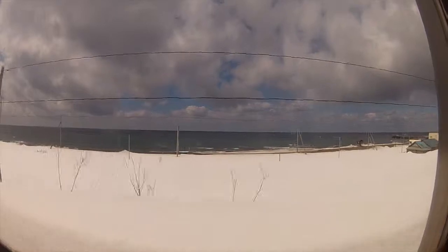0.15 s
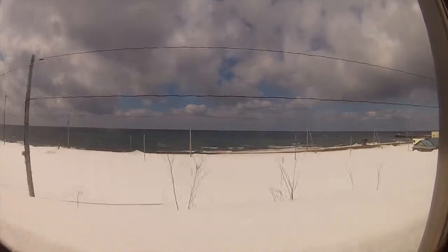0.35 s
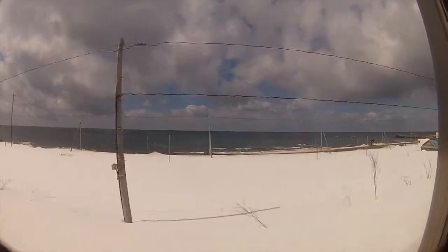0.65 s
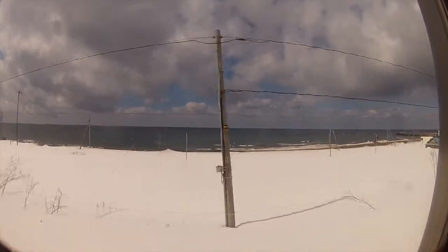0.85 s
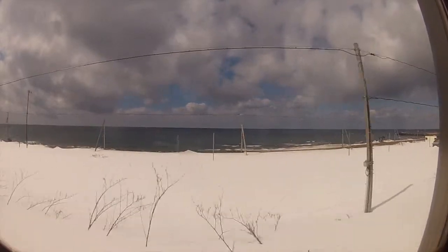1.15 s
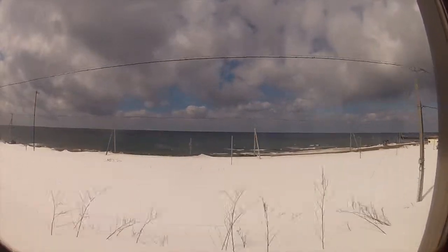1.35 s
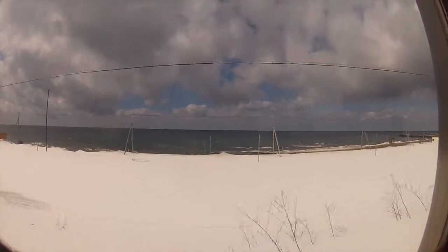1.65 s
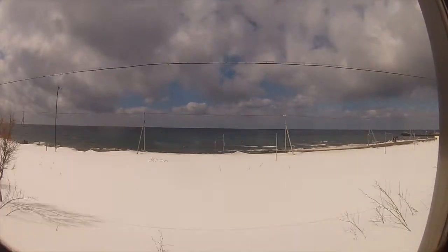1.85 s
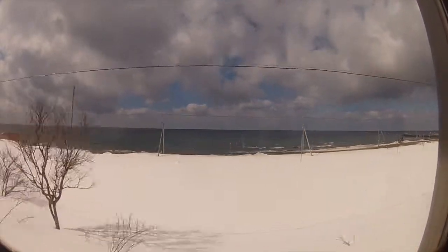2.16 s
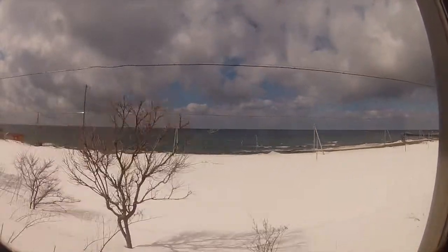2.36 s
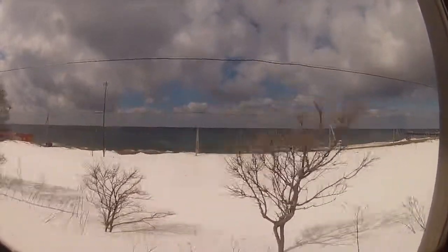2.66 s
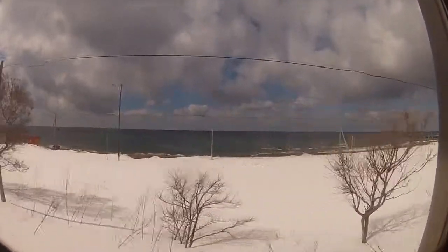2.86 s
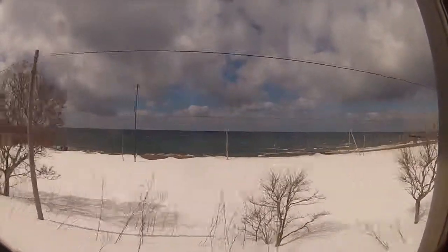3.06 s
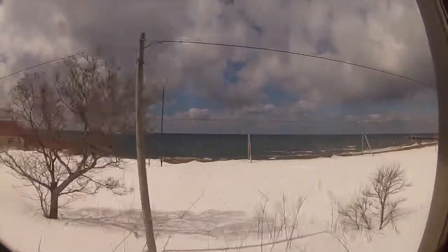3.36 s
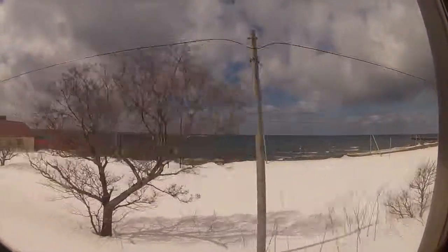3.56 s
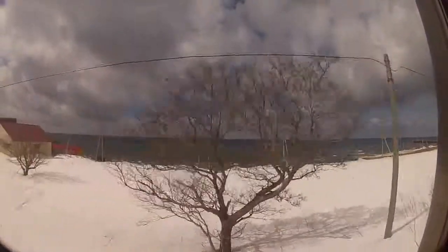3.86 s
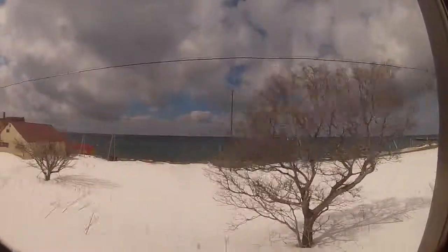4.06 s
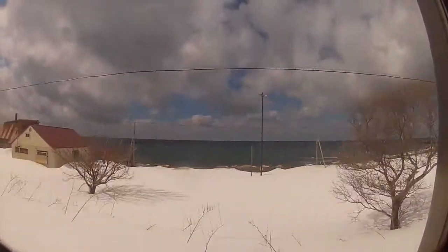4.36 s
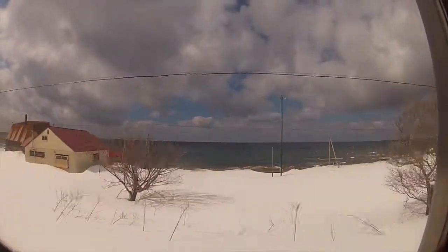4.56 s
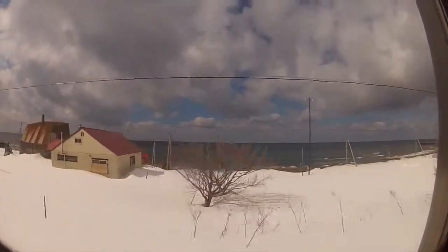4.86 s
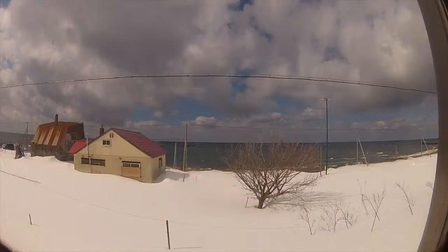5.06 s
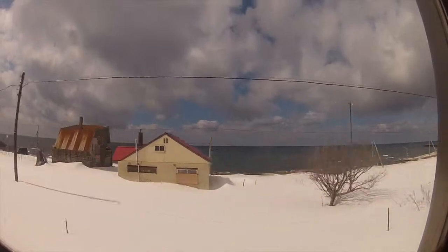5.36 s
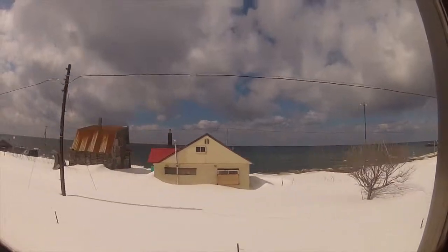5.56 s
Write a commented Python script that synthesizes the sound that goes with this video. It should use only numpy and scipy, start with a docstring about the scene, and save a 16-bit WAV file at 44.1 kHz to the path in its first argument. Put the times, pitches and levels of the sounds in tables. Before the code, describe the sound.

Heard inside a diesel railcar at speed: deep floor rumble and muffled wheel roar run throughout. The engine is faint at first, then surges before two seconds, eases, and pulls again with a rougher throb towards the end. Bogies knock dully in pairs over rail joints about every 1.1 seconds. Window fittings tick and chatter in bursts as the body shakes. A single close microphone in the cabin, slightly lo-fi.

```python
"""A diesel engine, heard inside a railcar at speed, picks up and pulls with an uneven throb: a sum of
cycle orders, plus noise puffs that boom in the cabin. Wheel noise rumbles and roars beneath.
Bogies knock over a joint once every rail length. The body shakes in spells: window fittings tick and
chatter, loose metal clinks, trim squeaks once and air hisses along the body.
Slow sample-and-hold mirrors the sound as a thin fizz around 12 kHz."""
import sys
import numpy as np
from scipy import signal
from scipy.fft import rfft, irfft, next_fast_len
from scipy.io import wavfile

SR = 44100
rng = np.random.default_rng(int(sys.argv[2]) if len(sys.argv) > 2 else 0)


def to_wav(sig):
    """Store sig (one row per channel, or 1-D mono) as 16-bit WAV at the path in sys.argv[1].

    Samples outside -1..1 are clipped; the rate is SR.
    """
    pcm = np.clip(np.atleast_2d(sig), -1, 1) * 32767
    pcm = np.round(pcm).astype(np.int16)
    wavfile.write(sys.argv[1], SR, pcm.T)  # frames by channels


N = 251811
T = np.arange(N) / SR


def gain_of(db):
    """Decibels to an amplitude factor."""
    return 10 ** (np.asarray(db) / 20)


def evened(x):
    """Scales to rms 1."""
    return x / np.sqrt(np.mean(x ** 2) + 1e-20)


def curve(rows):
    """Joins (time_s, value) rows by straight lines in time."""
    time_s, value = np.transpose(rows)
    return np.interp(T, time_s, value)


def coloured(x, spectrum):
    """Filters x with a minimum-phase, hence causal, response of the given spectrum."""
    freq_hz, db = np.transpose(spectrum)
    bin_hz = abs(np.fft.fftfreq(4096, 1 / SR))
    log_gain = np.log(gain_of(np.interp(np.log(bin_hz + 1), np.log(freq_hz), db)))
    response = np.fft.ifft(np.exp(np.conj(signal.hilbert(log_gain)))).real
    return signal.oaconvolve(x, response[:len(bin_hz) // 2])[:len(x)]


def noise(spectrum):
    """Gaussian noise of rms 1, shaped in frequency, silent above the last row."""
    freq_hz, db = np.transpose(spectrum)
    size = next_fast_len(N, True)
    bin_hz = np.fft.rfftfreq(size, 1 / SR)
    shape = gain_of(np.interp(np.log(bin_hz + 1), np.log(freq_hz), db, right=-np.inf))
    return evened(irfft(rfft(rng.standard_normal(size)) * shape, size)[:N])


def wander(max_hz):
    """Smooth random drift of rms 1: 24 sines of random phase over a decade up to max_hz."""
    t = T[::128]
    hz = np.geomspace(max_hz / 10, max_hz, 24)[:, None]
    phase_cycles = rng.random(hz.shape)
    drift = np.sin(2 * np.pi * (hz * t + phase_cycles)).sum(0)
    return np.interp(T, t, evened(drift))


def add(mix, start_s, sound):
    """Mixes a sound in place, cut at the end of the mix."""
    part = mix[round(start_s * SR):][:len(sound)]
    part += sound[:len(part)]


# four-stroke cycle rate: time_s, rate_hz
SPEED = [(0, 12.14), (1.0, 11.75), (1.4, 12.24), (1.65, 12.35), (1.9, 13.39), (2.1, 13.98), (2.4, 14.04),
         (2.7, 13.73), (3.8, 13.7), (5.71, 13.873)]
# drone level as the engine pulls: time_s, pull_db
PULL = [(0, -42), (1.47, -34), (1.72, -13.5), (1.95, -13), (2.1, -22.5), (3.3, -21), (3.78, -17),
        (4.45, -18.5), (4.65, -15), (5.71, -14.5)]
# cycle harmonics: order (multiple of cycle rate), full_pull_rel_db, follows (dB per dB of pull)
ORDERS = [(5, -43.5, .8), (6, -11, 0.37), (7, -19.5, 0.88), (8, -17, 1.2), (9, -12.5, 1), (10, -9.5, 1.07),
          (11, -1.5, 0.84), (12, 1, 1.05), (13, -24.5, 0.52), (14, -5, 0.43), (15, -19, 0.71),
          (16, -26.5, .7), (18, -25, 0.63), (20, -23, 0.45), (24, -27, 0.75)]
# cylinders that beat hardest: place_cycles (0-1), strength (factor)
BEATS = [(0, 1), (.35, .55)]
# crank-turn unevenness: time_s, lope (factor; 0 = even, sign = turn of the hardest beat)
LOPE = [(0, 0.056), (2.4, -0.68), (2.7, 0.35), (4.45, 0.61), (4.65, 0.79), (5.71, 1.14)]
# rough exhaust noise: time_s, level_db
ROAR = [(0, -33.5), (1.0, -26), (2.35, -18.5), (3.05, -30.5), (4.15, -21.5), (4.8, -29.5), (5.71, -24.5)]
# cabin boom spectrum: freq_hz, rel_db (per Hz)
BOOM = [(70, -25), (105, -14.5), (130, -5.5), (160, -6), (195, -10.5), (230, -15), (330, -31.5)]


def engine(waver=0.12, gating=0.16, full_pull_db=-15, hard_beat_s=5.0978):
    """Engine orders sum to two hard beats a cycle; each beat also puffs noise into the cabin's boom."""
    cycles = np.cumsum(curve(SPEED)) / SR
    cycles -= np.interp(hard_beat_s, T, cycles)  # the hardest cylinder fires at whole cycles
    pull_db, lope = curve(PULL), curve(LOPE)

    drone = np.zeros(N)
    for order, rel_db, follows in ORDERS:
        k = round(order)
        beat_sum = sum(strength * np.exp(-2j * np.pi * k * place) for place, strength in BEATS)
        phase_rad = np.angle(beat_sum)
        unlike_turns = lope if k % 2 else 1  # odd orders sound only when the two crank turns differ
        swell = gain_of(rel_db + full_pull_db + follows * (pull_db - full_pull_db))
        unsteady = 1 + waver * wander(7.6)
        drone += swell * unlike_turns * unsteady * np.cos(2 * np.pi * k * cycles + phase_rad)
    drone /= np.sqrt(sum(gain_of(row[1]) ** 2 for row in ORDERS) / 2)

    puffs = sum(strength * np.exp(4 * (np.cos(2 * np.pi * (cycles - place)) - 1))
                for place, strength in BEATS)
    roar = noise(BOOM) * evened(1 - gating + 2 * gating * puffs)
    return drone + gain_of(curve(ROAR)) * roar


# rolling level, shared with the air hiss: time_s, rel_db
ROLLING = [(0, -30.5), (1.2, -28), (1.8, -26), (2.6, -25), (3.1, -28), (4.0, -26), (5.71, -27)]
# floor rumble spectrum: freq_hz, rel_db (per Hz)
RUMBLE = [(10, -19), (20, -7), (32, -1.5), (48, -2), (72, 1.5), (100, -2), (140, 0), (220, -19.5),
          (400, -47.5)]
# rolling roar spectrum: freq_hz, rel_db (per Hz)
WHEELS = [(90, -29), (170, -1), (250, 5.5), (310, 0.5), (440, 0), (540, -3.5), (670, -5), (730, -2.5),
          (830, -8.5), (1000, -15.5), (1150, -22), (1300, -41), (1700, -38), (3000, -63)]


def wheels(rumble_db=-25.0, swell_db=0.9, roll_db=1, shake_db=2.0, flutter_db=1):
    """Floor rumble, plus rolling roar that swells with body shake and flutters with rail roughness."""
    rumble = gain_of(rumble_db + swell_db * wander(4.5)) * noise(RUMBLE)
    roll_level_db = curve(ROLLING) + roll_db + shake_db * shaking() + flutter_db * wander(25)
    return rumble + gain_of(roll_level_db) * noise(WHEELS)


# bogies meeting each joint in turn: delay_s, rel_db
BOGIES = [(0, -21.5), (0.391, -26)]
# joint hardness, in order along the track: rel_db
JOINTS = [3, 3.5, -1.5, -.5, 1, -3.5]
# knock spectrum: freq_hz, rel_db (per Hz)
KNOCK = [(60, -12), (250, 0), (450, 3.5), (800, 1), (1050, -8.5), (1400, -34.5), (3000, -29.5), (5500, -50)]


def joints(rail_s=1.11, second_joint_s=1.018, rise_s=0.0049, t60_s=0.34, level_db=0):
    """Each bogie knocks dully at each joint: a noise burst whose onset the floor blurs."""
    envelope = np.zeros(N)
    for rail, joint_db in enumerate(JOINTS):
        for delay_s, bogie_db in BOGIES:
            start_s = second_joint_s + (rail - 1) * rail_s + delay_s
            age_s = np.maximum(T - start_s, 0)
            decay = gain_of(level_db + joint_db + bogie_db - 60 * age_s / t60_s)
            envelope += decay * (1 - np.exp(-age_s / rise_s))
    return envelope * noise(KNOCK)


# body shakes, about one per rail length: peak_s, strength_db, fade_s (1/e, both sides)
SHAKES = [(0.389, -11, .15), (1.73, -2.5, .15), (2.809, 0, .11), (3.97, -2, .2), (5.07, -4, .14)]


def shaking():
    """Body shake as a factor: each spell builds exponentially to a peak and dies away again."""
    return sum(gain_of(db) * np.exp(-abs(T - peak_s) / fade_s) for peak_s, db, fade_s in SHAKES)


def small_ticks(count=34, level_db=-36.0, spread_db=2.5, at_rest=.25):
    """Rows (start_s, level_db) of faint ticks, drawn more densely while the body shakes."""
    chance = np.cumsum(at_rest + shaking())
    when, size = rng.random((count, 2)).T
    start_s = np.interp(when, chance / chance[-1], T)
    return list(zip(start_s, level_db + spread_db * (2 * size - 1)))


# loudest window-fitting ticks: start_s, level_db (before the part gains)
TICKS = [(0.2159, -33), (0.2542, -31), (0.3707, -24.5), (0.4828, -30), (0.5945, -36), (0.767, -28.5),
         (0.8799, -27.5), (1.4664, -28.5), (1.5983, -31), (1.724, -28.5), (1.856, -29.5), (1.978, -28.5),
         (2.4475, -29.5), (2.7008, -27), (2.83, -25), (2.9622, -25), (3.2316, -34), (3.819, -28),
         (3.925, -26), (3.9484, -26.5), (4.0807, -25), (4.2133, -26.5), (4.9362, -26), (5.0325, -30),
         (5.06, -23.5), (5.5568, -34)]
# snap spectrum: freq_hz, gain_db
SNAP = [(150, 2), (450, 17), (850, 17), (1300, -10), (1900, -3.5), (2400, -7.5), (3000, -11.5),
        (3800, -0.5), (4400, -11), (5000, -2), (6000, -13)]
# window frame spectrum, for ring and chatter: freq_hz, rel_db
FRAME = [(500, -11.5), (1300, -5.5), (1800, -4.5), (2250, 4), (2550, -2), (2950, 4), (3350, -4),
         (3900, -1.5), (4400, -7), (5000, -12.5), (6000, -19.5)]


def ticks(snap_db=17.0, ring_db=-9.0, ring_t60_s=0.037, bounce_s=0.0031, bounce=0.16,
          thud_db=2, thud_hz=640, thud_t60_s=.025):
    """A loose fitting snaps on the frame and bounces once; the frame rings, the wall panel thuds."""
    snaps, ring_envelope, t = np.zeros(N), np.zeros(N), T[:SR // 10]
    rows = list(TICKS) + small_ticks()
    variations = rng.uniform(0.63, 1.1, (len(rows), 2))  # factors on bounce delay and size
    for (start_s, db), (delay, size) in zip(rows, variations):
        add(snaps, start_s, [-gain_of(db)])
        add(snaps, start_s + bounce_s * delay, [gain_of(db) * bounce * size])
        add(ring_envelope, start_s, gain_of(db - 60 * t / ring_t60_s))
    thud = gain_of(thud_db - 60 * t / thud_t60_s) * np.sin(2 * np.pi * thud_hz * t)
    thuds = signal.oaconvolve(snaps, thud)[:N]
    ringing = gain_of(ring_db) * ring_envelope * noise(FRAME)
    return gain_of(snap_db) * coloured(snaps, SNAP) + ringing + thuds


def chatter(contacts_per_s=700, clump_db=2.3, ring_t60_s=0.048, ring=0.1, rest_db=-57, shaken_db=-40.0):
    """Random tiny contacts in the window frame, clumped, each ringing briefly; shaking raises them."""
    sizes = gain_of(3.5 * np.minimum(rng.exponential(1, N), 3))
    contacts = (rng.random(N) < contacts_per_s / SR) * sizes * rng.choice([-1, 1], N)
    t = T[:SR // 20]
    response = (t == 0) + ring * rng.standard_normal(len(t)) * gain_of(-60 * t / ring_t60_s)
    grains = coloured(signal.oaconvolve(contacts, response)[:N], FRAME)
    level = np.hypot(gain_of(rest_db), gain_of(shaken_db) * shaking())
    return level * evened(grains * gain_of(clump_db * wander(40)))


def clinks(clinks_per_s=22, level_db=-47, spread_db=3, ring_hz=3850, detune=0.088, t60_s=0.0096):
    """A small loose metal part clinks at random: decaying sines of slightly different pitch."""
    out, t = np.zeros(N), T[:SR // 20]
    for when, size, pitch in rng.random((round(clinks_per_s * T[-1]), 3)):
        envelope = gain_of(level_db - spread_db * np.log(size + .03) - 60 * t / t60_s)
        pitch_hz = ring_hz * (1 + detune * (pitch - .5))
        part = out[int(when * N):][:len(t)]
        part += (envelope * np.sin(2 * np.pi * pitch_hz * t))[:len(part)]
    return out


def squeak(peak_s=2.11, width_s=0.12, tone_db=-55, pitch_hz=4380, waver=.003, rub_db=-58):
    """Trim rubs once, faintly: a wavering tone in a little hiss, under a Gaussian envelope."""
    tone = np.sin(2 * np.pi * np.cumsum(pitch_hz * (1 + waver * wander(100))) / SR)
    rub = noise([(3300, -40), (4000, 4), (4500, -5), (5300, -14)])
    envelope = np.exp(-((T - peak_s) / width_s) ** 2)
    return envelope * (gain_of(tone_db) * tone + gain_of(rub_db) * rub)


# hiss spectrum of air along the body: freq_hz, rel_db (per Hz)
AIR = [(700, -16), (1200, 2.5), (1600, -0.5), (2150, 4.5), (2550, -2), (2950, 1), (3350, -6.5), (4000, -8),
       (5000, -12), (6000, -18)]


def air(rel_db=-23, shake_db=2.5, flutter_db=1.16):
    """Air hisses faintly along the body: shaped noise that follows the rolling level and the shaking."""
    level_db = curve(ROLLING) + rel_db + shake_db * shaking() + flutter_db * wander(22)
    return gain_of(level_db) * noise(AIR)


def scene():
    """Sums all sources into one channel."""
    engine_and_track = engine() + wheels() + joints()
    fittings = ticks() + chatter() + clinks() + squeak()
    return (engine_and_track + fittings + air())[None]


def record(dry, edge_hz=15500):
    """Samples at 12 kHz and holds each value, mirroring sound around 12 kHz; then limits the band."""
    eased = dry * signal.windows.tukey(N, .0015)  # short fades at both ends
    slow = signal.resample_poly(eased, 40, 147, axis=1)  # to 12 kHz
    steps = np.repeat(slow, 4, axis=1)  # held at 48 kHz
    held = signal.resample_poly(steps, 147, 160, axis=1)[:, :N]  # back to SR
    lowpass = signal.firwin(301, edge_hz, window=("kaiser", 9), fs=SR)
    return signal.oaconvolve(held, lowpass[None], "same")


dry = scene()
out = record(dry)
to_wav(out)
```